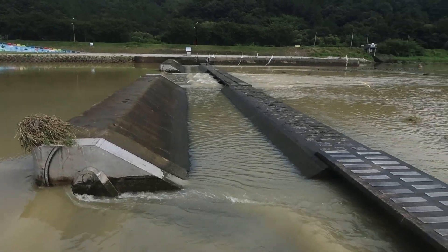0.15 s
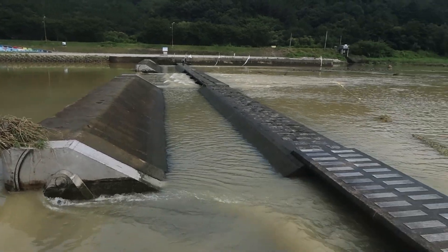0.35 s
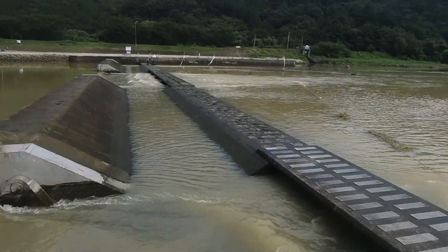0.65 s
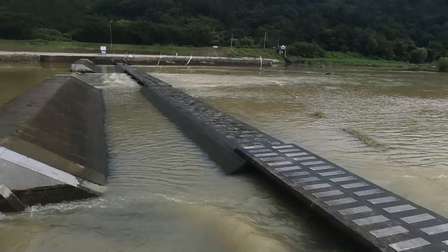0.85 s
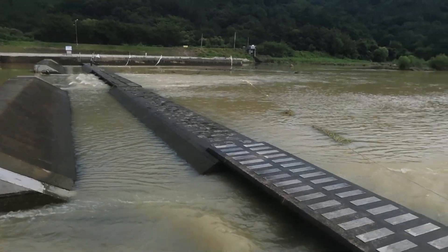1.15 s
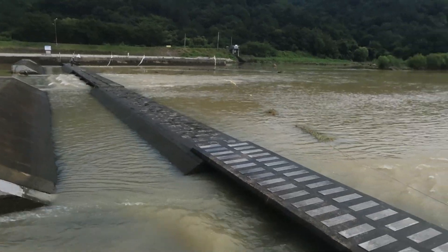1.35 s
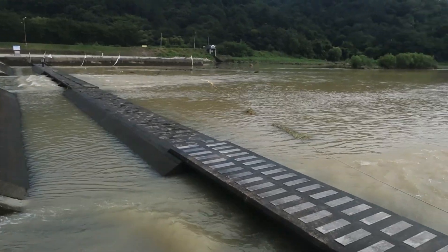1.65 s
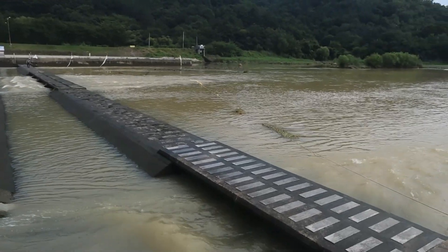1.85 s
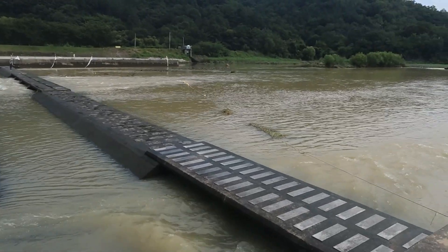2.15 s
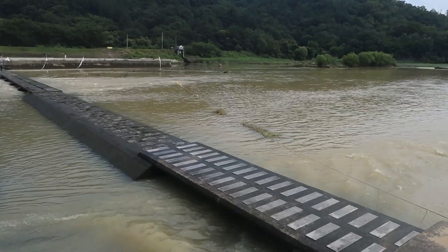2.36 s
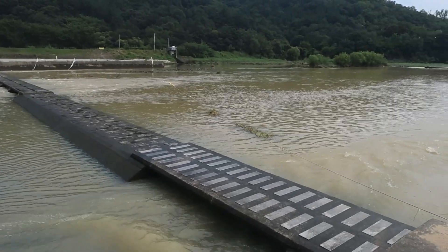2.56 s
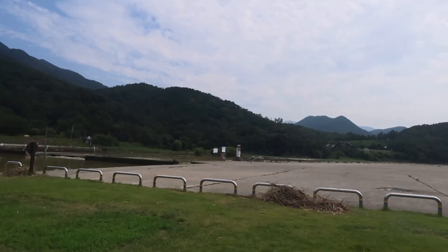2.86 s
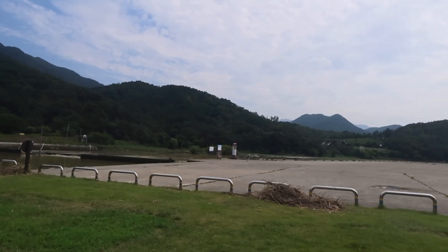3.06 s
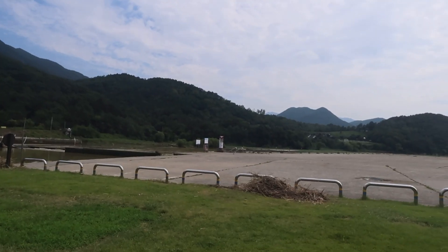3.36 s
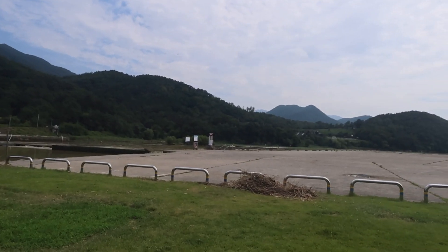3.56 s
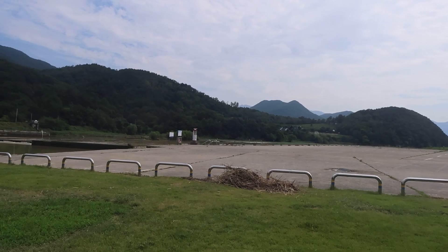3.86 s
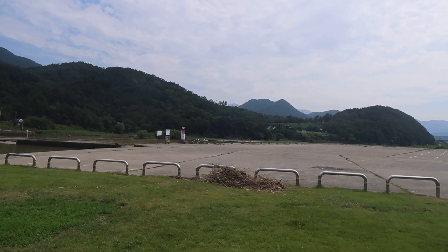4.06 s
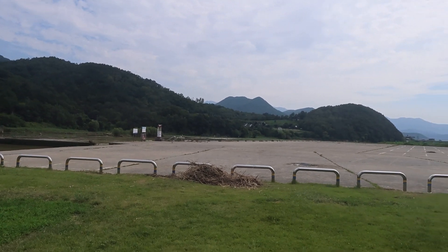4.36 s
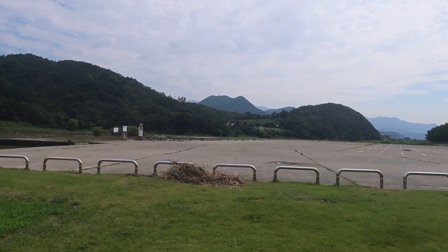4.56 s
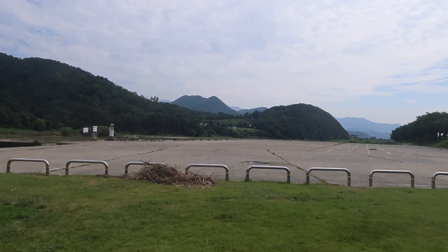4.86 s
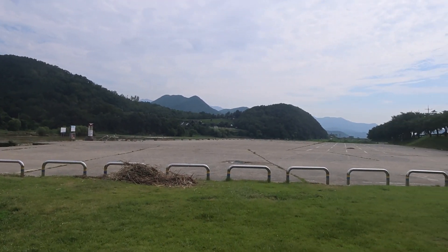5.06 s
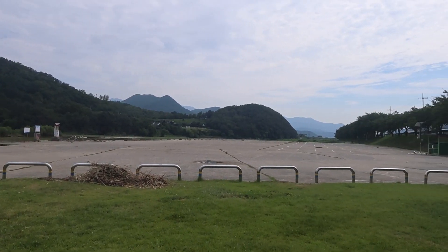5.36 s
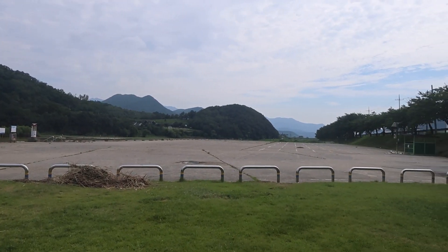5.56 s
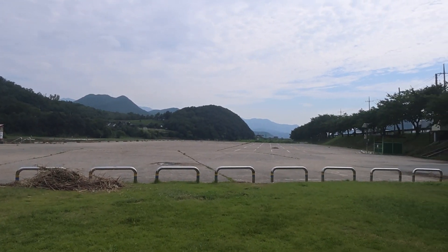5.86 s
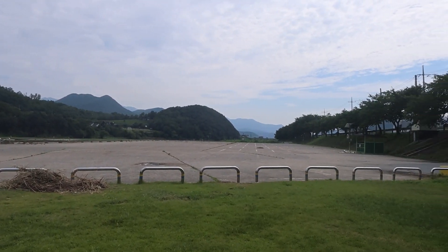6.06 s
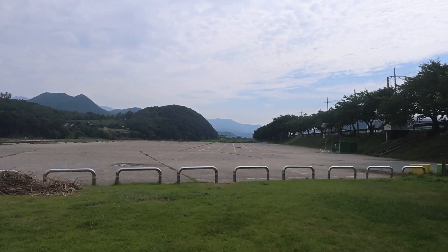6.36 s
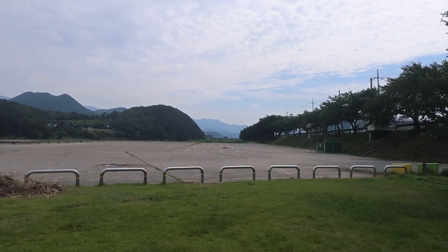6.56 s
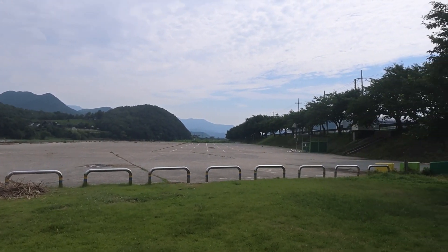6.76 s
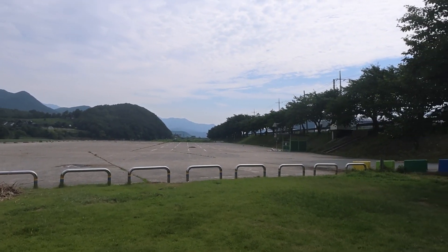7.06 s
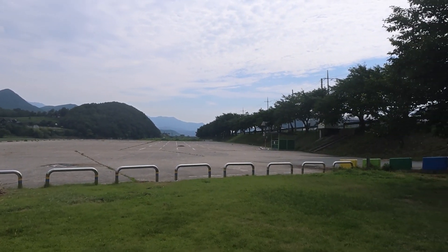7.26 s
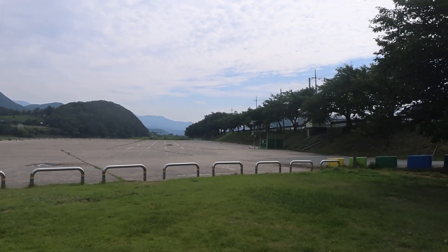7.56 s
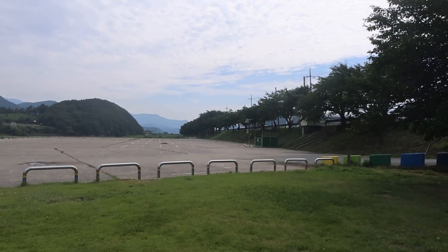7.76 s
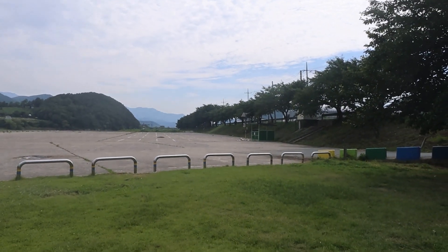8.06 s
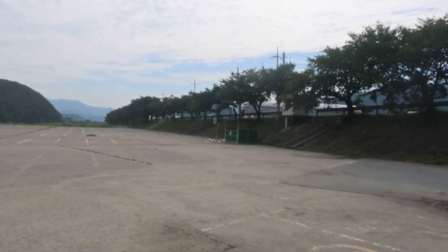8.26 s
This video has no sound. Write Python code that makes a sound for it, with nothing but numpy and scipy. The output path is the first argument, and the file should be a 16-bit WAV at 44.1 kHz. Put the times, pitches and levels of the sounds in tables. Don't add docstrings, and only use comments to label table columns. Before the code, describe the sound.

Loud roar of muddy water over a concrete weir, then a tiny silent gap and a much quieter buzzing cicada swelling over faint valley hum.

```python
import sys
import numpy as np
from scipy import signal
from scipy.io import wavfile
from scipy.ndimage import uniform_filter1d

SR = 44100
rng = np.random.default_rng(int(sys.argv[2]) if len(sys.argv) > 2 else 0)


def to_wav(sig):
    pcm = np.clip(np.atleast_2d(sig), -1, 1) * 32767
    pcm = np.round(pcm).astype(np.int16)
    wavfile.write(sys.argv[1], SR, pcm.T)


def attenuation_scalar(level_db):
    decades = np.asarray(level_db, float) / 20
    return 10 ** decades


N = 370868
WEIR_END_S, LOT_START_S = 2.8452, 2.8917
CLOSER_S = 8.215

# (pitch [Hz], level [dB])
WEIR_SHARED = [(18, -54), (30, -74), (69, -18), (369, 2.5), (639, -7.5), (852, -6), (1230, -6), (2990, -15),
               (3590, -15), (4090, -14.5), (4780, -12.5), (6370, -13), (9680, -26.5), (12600, -36),
               (15500, -44)]
# (pitch [Hz], level [dB])
WEIR_APART = [(59, -76), (100, -48), (159, -38), (447, -14.5), (791, -15.5), (1180, -9.5), (3250, -14),
              (3690, -5.5), (4280, -8.5), (4750, -2), (7410, -8.5), (13900, -36), (15500, -40)]
# (pitch [Hz], width [Hz], boost [dB])
WEIR_RINGS = [(380, 200, 0.5), (843, 154, 3), (1200, 280, 2.5), (3600, 530, 4.5), (4690, 390, 4.5)]
WEIR_APART_DB, FLOW_DB = -5.5, -29
THROB_HZ, THROB_DB = 53, -60

# (pitch [Hz], level [dB])
HUM = [(18, -64), (30, -50), (64, -9.5), (162, -0.5), (200, -8), (276, -5), (498, -9), (914, -11.5),
       (1390, -12.5), (1810, -16), (2800, -17.5), (3640, -36), (6160, -120)]
# (pitch [Hz], difference over sum [dB])
HUM_APART = [(100, -38), (300, -26), (700, -13), (1300, -8), (2500, -5)]
# (pitch [Hz], width [Hz], boost [dB])
HUM_RINGS = [(160, 52, 3.5), (270.7, 35, 7), (807, 260, 3)]
# (pitch [Hz], width [Hz], level [dB])
MOANS = [
    (100, 25, -15),
    (170, 22, -14),
    (272, 20, -14),
]
HUM_DB, HUM_FADE_DB_PER_S, HUM_CLOSER_DB, CLOSER_BODY_DB = -55, -0.45, -53, 2.5

# (time [s], rate [pulls per s])
PULLS = [
    (2.9, 42.54),
    (4.1, 43.21),
    (4.9, 44.4),
    (6.9, 44.79),
    (7.3, 45.14),
]
# (place in the pull [0-1], ring pitch [Hz], level [dB])
RIBS = [(.5, 6200, -4), (.575, 9500, -3), (.6, 5800, 0), (.63, 8800, -3), (.675, 6000, 2), (.7, 4200, -3),
        (.775, 6900, -1), (.78, 10200, -3), (.83, 5700, 1), (.87, 4400, -5), (.95, 7800, -2),
        (.92, 5800, -2), (1.0, 10800, -3), (1.015, 5900, 2), (1.05, 4000, -3), (1.14, 8500, -3),
        (1.16, 4700, -6)]
# (pitch [Hz], level [dB])
SONG = [(2400, -26.5), (3000, -16.5), (3600, -3), (4600, -2.5), (5800, -0.5), (7000, -2.5), (8000, -6.5),
        (9200, -9), (11300, -15), (13000, -15.5), (14300, -25), (16000, -50)]
# (time [s], near singer's effort [dB], far chorus level [dB])
SWELL = [
    (2.89, -45, -45),
    (3.5, -41, -46),
    (4.5, -37, -41.5),
    (5.5, -33.5, -42.2),
    (6.8, -33.5, -37),
    (7.5, -34, -33),
    (8.21, -34, -32),
    (8.22, -29, -34.5),
    (8.41, -30.5, -34.5),
]
# (pitch [Hz], width [Hz], boost [dB])
SLACK_BELLY = [(4000, 37, -1), (4320, 270, 2.8), (5280, 770, 2.7), (5480, 140, 4), (6160, 35, 2.1),
               (6900, 110, 5), (7210, 100, 6.5), (7620, 180, 6), (8250, 240, 5.5), (8720, 181, 8.3),
               (9020, 240, 7.7), (9860, 800, 8.2), (10530, 300, 5.5), (10810, 340, 7.5)]
# (pitch [Hz], width [Hz], boost [dB])
TAUT_BELLY = [(3570, 170, 6.9), (3900, 61, 1.7), (4685, 270, 9.3), (5200, 75, 4.1), (5440, 220, 4.8),
              (6940, 55, 3.2), (7200, 90, 3), (7800, 100, 3), (7800, 530, 5.4), (9000, 1000, 5.2),
              (10200, 330, 3.7), (11060, 650, 10), (10600, 351, 2), (11360, 180, 6.4)]
# (pitch [Hz], width [Hz], boost [dB])
TREES = [(3420, 295, 3.9), (4650, 150, 3.4), (4730, 390, 4.4), (5190, 92, 4.7), (5860, 190, 4.2),
         (6820, 100, 3.3), (7280, 200, 3.3), (7840, 270, 5.1), (8300, 150, 4.8), (8800, 720, 3.3),
         (9900, 760, 5.4), (10720, 200, 4.5), (11240, 970, 7.9)]
TAUT_FROM_DB, TAUT_SPAN_DB = -38, 4.5
TREES_FROM_DB, TREES_SPAN_DB = -43, 6.5
FULL_EFFORT_DB = -33.5
TREBLE_DB_PER_OCTAVE, TREBLE_PER_EFFORT = -8, 0.28
DRONE_DB, DRONE_PER_EFFORT, DRONE_TOP_DB = -6, -1.13, 2.5
NEAREST_LAG_US, PAN_US_PER_S, FACING_S = 77.5, 8.2, 7.02

CEILING_HZ, CREEP_HZ_PER_S, OPEN_HZ, CLOSER_HZ = 11580, 260, 2050, 12500
OPEN_S, OPEN_SPAN_S = 4.7, 1.6
MASKED_LOW_HZ, MASKED_HIGH_HZ = 1950, 3250
FAINT_HZ = 12300

FRAME, HOP = 1024, 256
HZ = np.fft.rfftfreq(FRAME, 1 / SR)[:, None]
T = np.arange(N // HOP + 6) * HOP / SR


def evened(x):
    return x / np.sqrt(np.mean(abs(x) ** 2) + 1e-20)


def read(points, hz=HZ):
    f, value = np.transpose(points)
    return np.interp(np.log(hz + 1), np.log(f + 1), value)


def follow(rows, t=T):
    s, *columns = np.transpose(rows)
    return [np.interp(t, s, c) for c in columns]


def bumps(peaks):
    return sum(db / (1 + (2 * (HZ - hz) / width) ** 4) for hz, width, db in peaks)


def patches(wide, long):
    field = rng.standard_normal((len(T), len(HZ))).T
    field = uniform_filter1d(field, wide, 0)
    return evened(uniform_filter1d(field, long, 1))


def wave(z):
    return signal.istft(z, nperseg=FRAME, noverlap=FRAME - HOP)[1][..., :N]


def diffuse(sum_db, apart_db, lean):
    a, b, c, d = rng.standard_normal((len(T), len(HZ), 4)).T
    shared = a + 1j * b
    separate = c + 1j * d
    both = shared * attenuation_scalar(sum_db)
    apart = (1j * lean * shared + np.sqrt(1 - lean ** 2) * separate) * attenuation_scalar(apart_db)
    return wave(np.array([both + apart, both - apart]))


def weir(churn_db=0.9, surge_db=0.34, splash_db=0.8, gurgle_db=1.7):
    field_db = churn_db * patches(wide=7, long=9)
    field_db += surge_db * patches(wide=200, long=20)
    field_db += splash_db * patches(wide=150, long=2) * np.clip(HZ / 9000, 0, 1)
    field_db += gurgle_db * patches(wide=3, long=16) / (1 + (HZ / 700) ** 4)
    sum_db = read(WEIR_SHARED) + bumps(WEIR_RINGS) + field_db
    apart_db = read(WEIR_APART) + WEIR_APART_DB + field_db
    return evened(diffuse(sum_db, apart_db, lean=0.45)) * attenuation_scalar(FLOW_DB)


def throb():
    t = np.arange(N) / SR
    loud_sway, pitch_sway = [np.interp(t, T, evened(uniform_filter1d(c, 30)))
                             for c in rng.standard_normal((2, len(T)))]
    turns = np.cumsum(THROB_HZ + 2.7 * pitch_sway) / SR
    return attenuation_scalar(THROB_DB + 3.8 * loud_sway) * np.sin(2 * np.pi * turns)


def hum(drift_db=1.1):
    t = np.arange(N) / SR
    sum_db = read(HUM) + bumps(HUM_RINGS) + drift_db * patches(wide=9, long=12)
    sum_db += CLOSER_BODY_DB * (T > CLOSER_S) / (1 + np.log2(HZ / 650 + .01) ** 4)
    low = evened(diffuse(sum_db, sum_db + read(HUM_APART), lean=0.22))
    for hz, width_hz, db in MOANS:
        a, b = uniform_filter1d(rng.standard_normal((2, N)), size=round(SR / width_hz), axis=1)
        moan = ((a + 1j * b) * np.exp(2j * np.pi * hz * t)).real
        low += attenuation_scalar(db) * evened(moan)
    fading_db = HUM_DB + HUM_FADE_DB_PER_S * (t - LOT_START_S)
    return low * attenuation_scalar(np.where(t < CLOSER_S, fading_db, HUM_CLOSER_DB))


def tymbal(pull_slip_s=.0001, rib_slip_s=.00003, spread_db=-0.5, rasp_db=-1, ring_s=.0006):
    t = np.arange(N) / SR
    turns = np.cumsum(follow(PULLS, t)[0]) / SR
    turns -= turns[round(2.9 * SR)]
    place, hz, db = np.transpose(RIBS)
    pull = np.arange(-2, turns[-1] - .6)[:, None]
    luck = rng.standard_normal((len(pull), 3, len(RIBS)))
    at = np.interp(pull + place, turns, t)
    at = at + pull_slip_s * luck[:, 0, :1] + rib_slip_s * luck[:, 1]
    index = np.floor(at * SR).astype(int)[..., None] + np.arange(160)
    age = np.maximum(index / SR - at[..., None], 0)
    ring = age * np.exp(-2 * age / ring_s) * np.sin(2 * np.pi * hz[:, None] * age)
    ring = attenuation_scalar(db + spread_db * luck[:, 2])[..., None] * ring
    clicks = np.bincount(index.ravel(), ring.ravel(), N)[:N]
    resting = np.exp(3.0 * (np.cos(2 * np.pi * (turns - .32)) - 1))
    rasp = attenuation_scalar(rasp_db - 6.5 * resting) * rng.standard_normal(N)
    return attenuation_scalar(-6) * evened(clicks) + rasp


def leaves(x, t60=0.11):
    age = np.arange(8000) / SR
    signs = rng.choice([-1., 1.], (2, 8000))
    hits = rng.random((2, 8000)) < .05
    taps = signs * hits * attenuation_scalar(-60 * age / t60) * (age > .002)
    return signal.oaconvolve(x[None], taps / np.linalg.norm(taps[0]), axes=1)[:, :N]


def song_db():
    effort_db, chorus_db = follow(SWELL)
    over_db = effort_db - FULL_EFFORT_DB
    treble = TREBLE_DB_PER_OCTAVE + TREBLE_PER_EFFORT * over_db
    drone_db = np.clip(DRONE_DB + DRONE_PER_EFFORT * over_db, DRONE_DB, DRONE_TOP_DB)
    colour = read(SONG) + treble * np.log2(np.maximum(HZ / 7500, 1))
    colour = colour + drone_db / (1 + (HZ / 4800) ** 8)
    taut = np.clip((effort_db - TAUT_FROM_DB) / TAUT_SPAN_DB, 0, 1)
    trees = np.clip((chorus_db - TREES_FROM_DB) / TREES_SPAN_DB, 0, 1)
    belly = (1 - taut) * bumps(SLACK_BELLY) + taut * bumps(TAUT_BELLY)
    colour += (1 - trees) * belly + trees * bumps(TREES)
    return colour - 10 * np.log10(np.sum(attenuation_scalar(2 * colour), 0))


def cicadas(echo_db=-13, chorus_apart_db=3.0, shimmer_db=0.76, breeze_db=0.55):
    colour = song_db() + shimmer_db * patches(wide=5, long=60) + breeze_db * patches(wide=120, long=22)
    effort_db, chorus_db = follow(SWELL)
    song = tymbal()
    direct, *echo = signal.stft([song, *leaves(song)], nperseg=FRAME, noverlap=FRAME - HOP)[2]
    frames = direct.shape[1]
    late_us = NEAREST_LAG_US + PAN_US_PER_S * abs(T - FACING_S)
    lag = 2 * np.pi * HZ * late_us / 1e6 + .35 / (1 + (HZ / 6500) ** 4)
    z = np.array([direct * np.exp(-1j * lag[:, :frames]), direct]) + attenuation_scalar(echo_db) * np.array(echo)
    heard = abs(z[..., round(LOT_START_S * SR / HOP):]) ** 2
    flat = z / np.sqrt(uniform_filter1d(heard.mean((0, 2)), size=9))[:, None]
    near = wave(flat * attenuation_scalar(colour)[:, :frames])
    apart_db = chorus_apart_db - 4 * np.log2(HZ / 5500 + .01) ** 2 / (1 + HZ / 9000)
    far = diffuse(colour, colour + apart_db, lean=-.3)
    t = np.arange(N) / SR
    near = evened(near) * attenuation_scalar(np.interp(t, T, effort_db))
    return near + evened(far) * attenuation_scalar(np.interp(t, T, chorus_db))


def thin_out(x, hole_db=-1.9, ragged_hz=200):
    z = signal.stft([x[0] + x[1], x[0] - x[1]], nperseg=FRAME, noverlap=FRAME - HOP)[2]
    t = T[:z.shape[2]]
    in_lot = t > LOT_START_S
    patch = uniform_filter1d(abs(z) ** 2, size=2, axis=1)
    patch = uniform_filter1d(patch, size=6, axis=2)
    weak = patch < attenuation_scalar(2 * hole_db) * uniform_filter1d(patch * in_lot, size=60, axis=2)
    masked = (HZ > MASKED_LOW_HZ) & (HZ < MASKED_HIGH_HZ)
    drop = weak & (masked | (HZ > FAINT_HZ))
    steps = np.repeat(rng.standard_normal(len(t)), 8)[:len(t)]
    ceiling_hz = CEILING_HZ + CREEP_HZ_PER_S * (t - LOT_START_S)
    ceiling_hz += OPEN_HZ * np.clip((t - OPEN_S) / OPEN_SPAN_S, 0, 1)
    drop[0] |= HZ > np.where(t < CLOSER_S, ceiling_hz + ragged_hz * steps, CLOSER_HZ)
    both, apart = wave(z * ~(drop & in_lot))
    return np.array([both + apart, both - apart]) / 2


def scene():
    t = np.arange(N) / SR
    river = weir() + throb()
    lot = hum() + cicadas() * attenuation_scalar([[.5], [-.5]])
    return river * (t < WEIR_END_S) + lot * (t >= LOT_START_S)


def band_limit(x):
    return signal.sosfilt(signal.butter(12, 15760, fs=SR, output="sos"), x)


def record(dry):
    bass_cut = signal.butter(3, 52, "highpass", fs=SR, output="sos")
    thinned = thin_out(signal.sosfilt(bass_cut, dry))
    middle_s = (WEIR_END_S + LOT_START_S) / 2
    gap = np.abs(np.arange(N) / SR - middle_s) < (LOT_START_S - WEIR_END_S) / 2
    return band_limit(thinned * ~gap)


dry = scene()
out = record(dry)
to_wav(out)
```